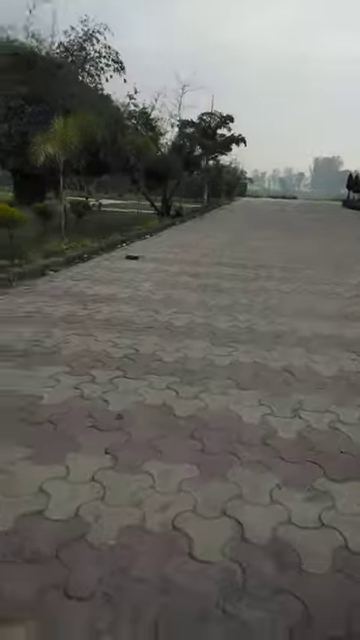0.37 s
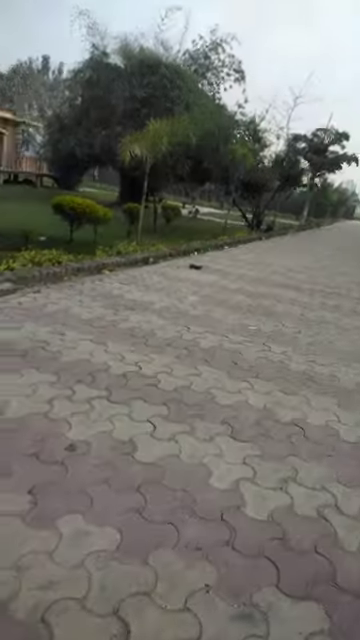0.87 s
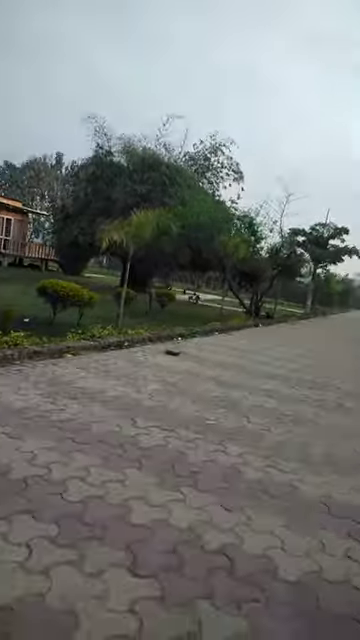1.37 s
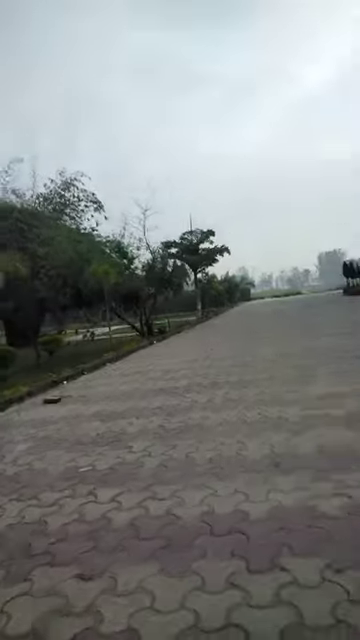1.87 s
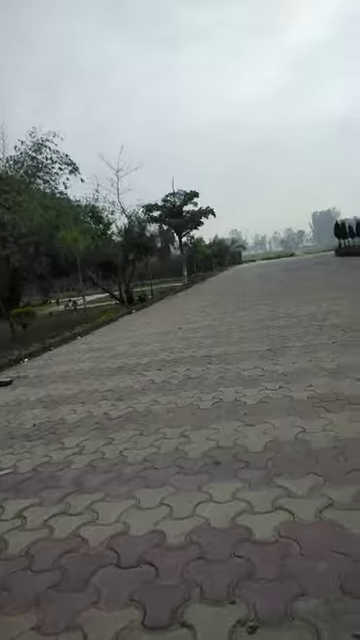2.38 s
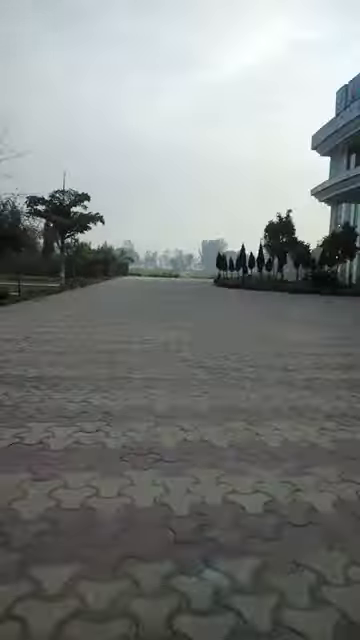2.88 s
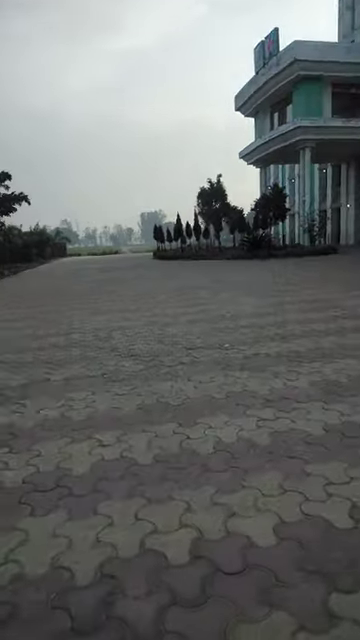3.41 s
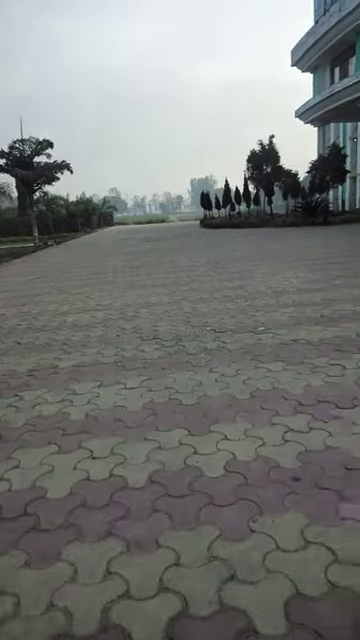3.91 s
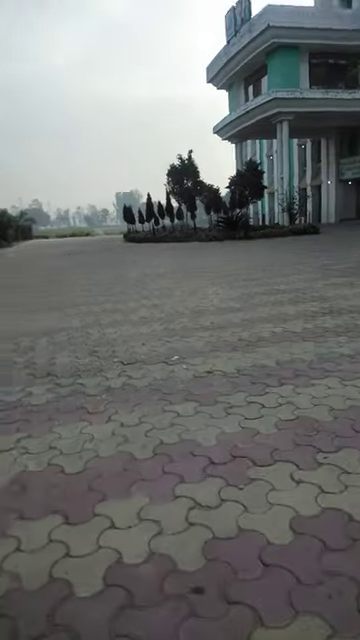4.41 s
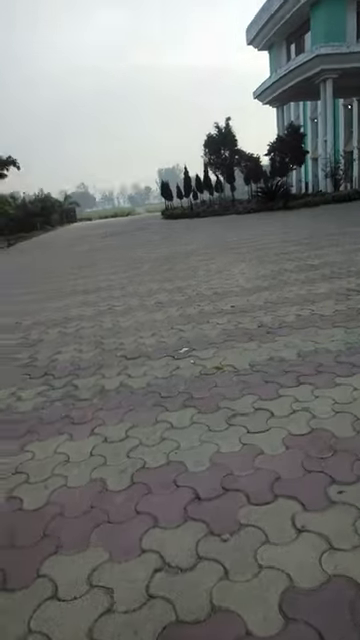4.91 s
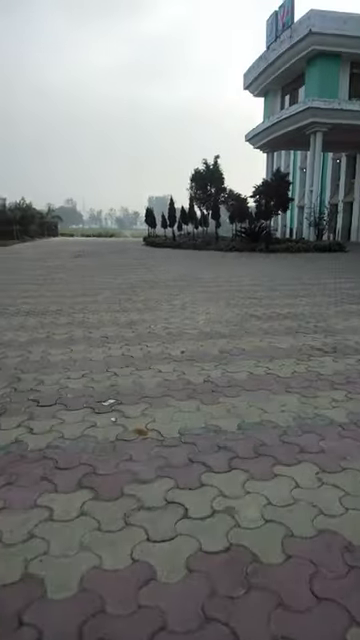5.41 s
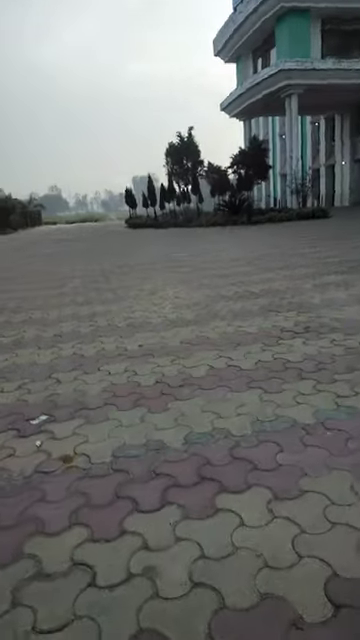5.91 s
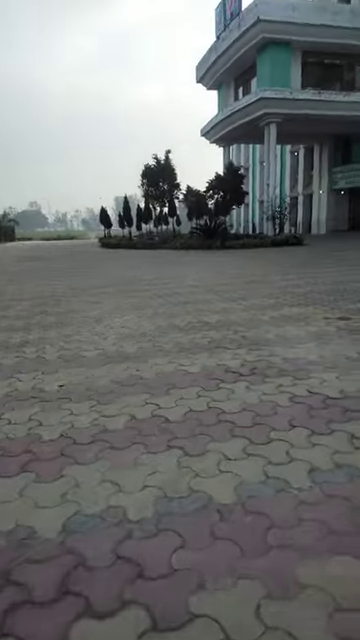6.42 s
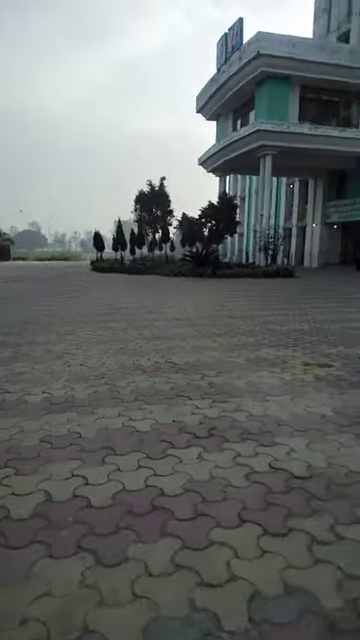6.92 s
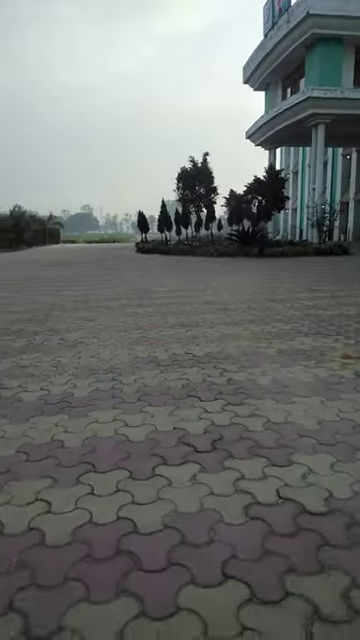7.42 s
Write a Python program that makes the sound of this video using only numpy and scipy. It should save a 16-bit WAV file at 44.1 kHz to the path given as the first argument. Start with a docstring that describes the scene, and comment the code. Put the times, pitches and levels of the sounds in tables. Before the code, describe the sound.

Close, dry handling noise: irregular muffled knocks, gritty skin scuffs and low jolting rumble on a handheld device in a quiet open yard.

```python
"""A phone is carried at a walk over paving in a quiet open yard. From the start a hand rubs its case as
band-shaped grit and jolts it into low rumble, over faint air and hiss made of shaped noise.
Knocks, as damped swings with no ring, follow throughout; near 1 s a fingertip creaks by stick and slip.
At 2.6 s the background drops away while the hand shifts, then creeps back. From 3.9 s thin far tones
glide by, as narrow noise, and from 6.2 s a blurred far hum, as wider noise, grows."""
import sys
import numpy as np
from scipy import signal
from scipy.fft import rfft, irfft
from scipy.io import wavfile
from scipy.ndimage import uniform_filter1d

SR = 44100
rng = np.random.default_rng(int(sys.argv[2]) if len(sys.argv) > 2 else 0)


def convert_level_to_amplitude(level_db):
    """Map a level in decibels to its linear amplitude factor."""
    exponent = np.asarray(level_db, float) / 20
    return 10 ** exponent


def put_to_file(sound):
    """Save the sound as 16-bit audio at rate SR, in the file named by the first command-line argument."""
    columns = np.atleast_2d(sound).T  # one column per channel
    safe = np.clip(columns, -1, 1)
    whole_steps = np.round(safe * 32767)
    wavfile.write(sys.argv[1], SR, whole_steps.astype(np.int16))


N = 332770


def evened(x):
    """Normalization: a signal is scaled to unit rms."""
    return x / np.sqrt(np.mean(x ** 2) + 1e-20)


def curve(rows, column):
    """Linear interpolation: one column of a time table, at every sample."""
    rows = np.asarray(rows, float)
    return np.interp(np.arange(N) / SR, rows[:, 0], rows[:, column])


def coloured(x, points):
    """Spectral shaping: each frequency is weighted in dB, then the whole is scaled to unit rms."""
    f, db = np.transpose(points)
    hz = np.fft.rfftfreq(len(x), 1 / SR)
    gain = convert_level_to_amplitude(np.interp(np.log(hz + 1), np.log(f + 1), db))
    return evened(irfft(rfft(x) * gain, len(x)))


def add(mix, s, sound):
    """Superposition: a sound is summed into the mix from time s."""
    part = mix[max(round(s * SR), 0):][:len(sound)]
    part += sound[:len(part)]


def swell(mix, middle, length, db):
    """Superposition of a smooth rise and fall around a moment."""
    shape = convert_level_to_amplitude(db) * np.hanning(round(length * SR))
    position = np.arange(len(shape)) + (middle - length / 2) * SR
    return mix + np.interp(np.arange(N), position, shape, 0, 0)


def grit(per_s, spread_db):
    """Impulsive friction: tiny catches of skin on plastic, a few much larger than the rest."""
    size = convert_level_to_amplitude(spread_db * np.minimum(rng.exponential(1, N), 4))
    return size * rng.standard_normal(N) * (rng.random(N) < per_s / SR)


def push(hz, t60, rise, size=1500):
    """Heavy damping: a swing with a soft start dies away exponentially; its peak is 1."""
    t = np.arange(size) / SR
    swing = (1 - np.exp(-(t / rise) ** 2)) * convert_level_to_amplitude(-60 * t / t60) * np.sin(2 * np.pi * hz * t)
    return swing / abs(swing).max()


def fuzzy(hz, width_hz):
    """Modulation: slow complex noise, carried on the pitch curve hz, becomes a narrow moving band."""
    wander = signal.lfilter([1], [1, -np.exp(-np.pi * width_hz / SR)], rng.standard_normal((2, N)))
    carrier = np.exp(2j * np.pi * np.cumsum(hz) / SR)
    return evened(((wander[0] + 1j * wander[1]) * carrier).real)


# The restless hand between events. Each row: time in seconds, rub level in dB,
# brightness in dB relative to the rub, sway rumble in dB.
HAND_MOTION = [(0, -58, -2, -54), (0.3, -69.5, 6.5, -54.5), (0.56, -78.5, 12, -59), (0.75, -66, 12, -53.5),
               (0.96, -66.5, 3, -54), (1.3, -67, -4, -57), (1.7, -68.5, -2.5, -49.5),
               (2.5, -63.5, -1.5, -48.5), (2.6, -80.5, -1, -58.5), (3.0, -76, -5, -53.5),
               (3.33, -79.5, -5.5, -48), (3.5, -70, 0, -57.5), (4.0, -73.5, -0.5, -54.5),
               (4.8, -78, -4.5, -53.5), (5.5, -73, -14, -48.5), (5.8, -75, -6, -50.5),
               (6.6, -67.5, -9.5, -51), (7.55, -81, 1, -52.5)]
# Slow rubs that swell and fade. Each row: middle in seconds, length in seconds, rub level in dB,
# brightness in dB relative to the rub.
SLOW_RUBS = [(0.097, 0.25, -57.5, 3.5), (0.421, 0.098, -57.5, 0), (1.053, 0.18, -48, 11),
             (1.131, 0.063, -45.5, -6.5), (1.19, 0.15, -52.5, -8.5), (1.415, 0.29, -55.5, -10.5),
             (1.784, 0.11, -85, -22), (2.024, 0.15, -44.5, -9.5), (2.141, 0.18, -40.5, -4.5),
             (3.423, 0.14, -64, -5.5), (3.547, 0.092, -65, -16), (3.898, 0.047, -62.5, -10.5),
             (4.15, .2, -62, -10), (4.916, .2, -68, -7), (5.11, 0.12, -69, -8.5), (5.46, .2, -66.5, -12),
             (5.993, 0.18, -56.5, -13), (6.702, 0.18, -66, -23), (6.857, .12, -72, -5),
             (7.137, 0.17, -66, -9), (7.266, 0.053, -69, -7)]
# Jolts of the walk through the arm. Each row: middle in seconds, rumble level in dB.
WALK_JOLTS = [(0.24, -54), (0.88, -51), (1.0, -41.5), (1.2, -48), (1.38, -45), (1.76, -58), (2.0, -52),
              (2.07, -48), (2.13, -53), (2.32, -54), (2.48, -51.5), (2.88, -45), (3.04, -43), (3.28, -37.5),
              (3.38, -55), (3.598, -45.5), (3.8, -56), (4.161, -50.5), (4.421, -45), (4.88, -45.5),
              (5.04, -46), (5.44, -40.5), (5.6, -35.5), (5.68, -40), (6.0, -32), (6.08, -34.5), (6.24, -64),
              (6.54, -55), (6.72, -37.5), (6.8, -44), (7.28, -59), (7.44, -53)]
# Short drags of skin with clear ends. Each row: start in seconds, length in seconds, rub level in dB,
# brightness in dB relative to the rub, shake level in dB.
SKIN_SCUFFS = [(0.08, 0.11, -59, 9.5, -43), (0.227, 0.059, -55, 0, -62), (0.79, 0.092, -62, 15.5, -48),
               (0.825, 0.021, -46, 15.5, -36), (0.839, 0.032, -43, 4.5, -43), (1.42, 0.01, -43, -9, -26),
               (1.437, 0.011, -55, 2, -27), (1.45, 0.01, -37, -10, -41), (1.461, 0.011, -39, -9, -44),
               (1.478, 0.0057, -34.5, -5.5, -24), (1.489, 0.011, -25.5, -12.5, -24),
               (1.5, 0.015, -29, -11, -38), (1.514, 0.013, -47, 10.5, -24.5), (1.548, 0.0083, -29, -4, -24),
               (1.955, 0.013, -31.5, -4.5, -31), (2.188, 0.17, -58, 1, -55), (2.568, 0.017, -68, -20, -56),
               (2.676, 0.025, -59, -12, -47), (2.698, 0.018, -61.5, 5, -49), (2.722, 0.017, -55, 0, -39),
               (2.756, 0.012, -41.5, 7, -48), (2.777, 0.012, -48, 6, -53), (2.79, 0.018, -44.5, 2.5, -32),
               (2.806, 0.086, -39.5, -0.5, -34), (2.979, 0.0063, -43, 4.5, -24),
               (3.027, 0.023, -45, -8, -26.5), (3.096, 0.047, -60, -20, -57),
               (3.162, 0.027, -44.5, -7.5, -38.5), (3.307, 0.028, -50.5, -8, -42.5),
               (3.658, 0.082, -69, 11, -65), (4.316, 0.058, -51, -8.5, -48), (4.502, 0.031, -55.5, -4, -51),
               (5.088, 0.038, -60, -12, -32), (5.685, 0.027, -38.5, -17, -34.5),
               (6.013, 0.089, -36, -11, -52), (6.04, 0.042, -31.5, -6, -25), (6.078, 0.026, -45, -7, -38.5),
               (6.702, 0.011, -28, -4, -41), (6.756, 0.031, -54, -6.5, -52)]
# Spectrum of skin on the case. Each row: frequency in Hz, relative density in dB per Hz.
RUB_SPECTRUM = [(60, -24), (150, 1), (400, -5.5), (1000, -8.5), (2300, -15), (3500, -21.5), (5000, -31.5),
                (7000, -39.5), (8800, -36.5), (11000, -47), (16000, -75)]
# Spectrum of the shaken port. Each row: frequency in Hz, relative density in dB per Hz.
RUMBLE_SPECTRUM = [(10, -23), (25, 5), (70, -4), (150, -8.5), (300, -24), (700, -18), (2000, -88.5)]
# Spectrum of the carrying arm. Each row: frequency in Hz, relative density in dB per Hz.
SWAY_SPECTRUM = [(5, 3), (15, 4.5), (40, -5), (90, -10), (160, -21), (300, -33.5), (2000, -100)]
JOLT_S = 0.14
RESTLESS_DB, RESTLESS_S = 5, 0.08  # rms wander of the rub level, and its smoothing time


def strokes():
    """Friction noise: dense grit under the moving skin; the same motion shakes the port into rumble."""
    size = round(RESTLESS_S * SR)
    restless = evened(uniform_filter1d(uniform_filter1d(rng.standard_normal(N), size), size))
    rub_gain = convert_level_to_amplitude(curve(HAND_MOTION, 1) + RESTLESS_DB * restless)
    bright_gain = rub_gain * convert_level_to_amplitude(curve(HAND_MOTION, 2))
    sway_gain = convert_level_to_amplitude(curve(HAND_MOTION, 3))
    shake_gain = np.zeros(N)
    for s, length, db, bright_db in SLOW_RUBS:
        rub_gain = swell(rub_gain, s, length, db)
        bright_gain = swell(bright_gain, s, length, db + bright_db)
    for s, db in WALK_JOLTS:
        sway_gain = swell(sway_gain, s, JOLT_S, db)
    for s, length, db, bright_db, shake_db in SKIN_SCUFFS:
        taper = np.clip(0.015 / length, 0.4, 1)
        contact = signal.windows.tukey(round(length * SR) + 90, taper)
        add(rub_gain, s - 0.001, convert_level_to_amplitude(db) * contact)
        add(bright_gain, s - 0.001, convert_level_to_amplitude(db + bright_db) * contact)
        add(shake_gain, s - 0.001, convert_level_to_amplitude(shake_db) * contact)
    rub = coloured(grit(7000, 1.0), RUB_SPECTRUM)
    dull = signal.lfilter(*signal.butter(2, 1600, fs=SR), rub)
    bright = rub - dull
    uneven = convert_level_to_amplitude(0.7 * evened(uniform_filter1d(rng.standard_normal(N), 350)))
    shake = shake_gain * coloured(grit(1500, 3.4), RUMBLE_SPECTRUM)
    shake = shake + sway_gain * coloured(grit(250, 1.52), SWAY_SPECTRUM)
    # the hand passes only slow motion
    shake = signal.sosfilt(signal.butter(4, 350, fs=SR, output="sos"), shake)
    return uneven * (rub_gain * dull + bright_gain * bright) + shake


# Spectrum of the air and hiss. Each row: frequency in Hz, relative density in dB per Hz.
AIR_SPECTRUM = [(60, -24.5), (120, -7.5), (200, 1), (260, -12.5), (500, -9.5), (850, -21.5), (1300, -19),
                (2000, -25), (3000, -32), (6000, -33), (16000, -32.5)]
# The background drops away while the hand shifts, then creeps back.
# Each row: time in seconds, change of the air level in dB.
AIR_CHANGE = [(0, 0), (1, -1.5), (2.5, -2), (2.575, 1), (2.6, -24), (3.33, -19), (3.4, -13), (4, -8),
              (5, -5.5), (6, -5), (7, -4), (7.55, -3)]
# Thin far tones that glide, swell and fade. Each row: start in seconds, length in seconds,
# first frequency in Hz, last frequency in Hz, level at the height of the swell in dB.
FAR_TONES = [(3.926, .3, 386, 436, -75), (5.1, 0.37, 379, 389, -71), (6.142, .42, 385, 508, -70.5),
             (6.338, 0.276, 864, 940, -73), (6.772, .25, 843, 808, -68.5), (6.749, 0.924, 784, 759, -71.5),
             (6.797, 0.96, 940, 900, -81.5), (6.898, 1, 1740, 1760, -84), (7.307, 0.424, 401.5, 491, -68)]
# A blurred far hum that grows late. The row: start in seconds, rise in seconds, centre in Hz,
# width in Hz, full level in dB.
FAR_HUM = (6.2, 2, 898, 300, -74)
AIR_DB = -62.5  # rms before the changes
TONE_WIDTH_HZ = 17


def yard():
    """Band-limited noise: broad for distant air and hiss, narrow for gliding tones and a far hum."""
    t = np.arange(N) / SR
    air_gain = convert_level_to_amplitude(AIR_DB + curve(AIR_CHANGE, 1))
    background = air_gain * coloured(rng.standard_normal(N), AIR_SPECTRUM)
    for start, length, first_hz, last_hz, db in FAR_TONES:
        glide_hz = np.interp(t, [start, start + length], [first_hz, last_hz])
        tone_gain = np.sqrt(swell(0, start + length / 2, length, 2 * db))  # the swell is in power
        background = background + tone_gain * fuzzy(glide_hz, TONE_WIDTH_HZ)
    start, rise, hz, width_hz, db = FAR_HUM
    band = signal.butter(2, [hz - width_hz / 2, hz + width_hz / 2], "band", fs=SR, output="sos")
    hum = evened(signal.sosfilt(band, rng.standard_normal(N)))
    return background + convert_level_to_amplitude(db) * np.clip((t - start) / rise, 0, 1) * hum


TICKS_PER_S, TICK_DB, TICK_SPREAD_DB = 1.8, -56, 3  # the level varies evenly by +/- the spread
TICK_HZ, TICK_EDGE_DB = 520, -20.5  # the pitch varies by +/- half an octave; edge relative to the blow


def ticks():
    """Poisson process: faint knocks of the grip come by chance, as rows like those of the knocks."""
    when, size, pitch = rng.random((40, 3)).T
    at = np.cumsum(-np.log(1 - when) / TICKS_PER_S)
    rows = []
    for s, a, b in zip(at, size, pitch):
        if s < N / SR:
            db = TICK_DB + TICK_SPREAD_DB * (2 * a - 1)
            rows.append((s, db, TICK_HZ * 2 ** (b - 0.5), 0, TICK_EDGE_DB))
    return rows


# Knocks of the grip. Each row: time in seconds, peak of the blow in dB, pitch of the blow in Hz,
# thump in dB relative to the blow, edge in dB relative to the blow.
GRIP_KNOCKS = [(0.037, -43, 910, -5, 4), (0.078, -35, 577, -7, -7), (0.232, -39, 684, 6, -6.5),
               (0.237, -27, 575, -11, -11), (0.401, -46.5, 463, 2.5, -9), (0.588, -42, 1330, -15, -11),
               (0.645, -32.5, 584, -23, -12.5), (0.714, -50.5, 1070, 0, 10), (0.754, -36.5, 620, -14, -6),
               (0.77, -45, 800, -6, -6), (1.214, -11.5, 471, -12.5, -43), (1.307, -54.5, 345, 15, -23),
               (1.367, -38, 900, 1, -7), (1.386, -21, 327, -2.5, -8.5), (1.416, -25, 395, -4.5, -46),
               (1.543, -31.5, 330, -5, -40), (1.55, -14, 613, -23, -24), (1.552, -20, 714, -7, -33),
               (1.788, -33.5, 580, -31, -27), (1.899, -27.5, 704, -25, -30.5),
               (1.956, -16.5, 750, -13, -12), (1.959, -27, 520, -31, -15), (1.964, -22.5, 490, -35, -28),
               (1.985, -19.5, 730, -13, -18), (2.329, -48.5, 550, 1.5, -7), (2.358, -37, 507, -20, -37),
               (2.469, -29.5, 875, -31, -53.5), (2.501, -32, 462, -6.5, -26), (2.562, -8.5, 560, -33, -7),
               (2.679, -47, 430, -1, -17), (2.699, -38.5, 550, -7, -33), (2.728, -30.5, 564, -20, -6),
               (2.732, -41, 560, -24, -5), (2.759, -10.5, 690, -9.5, -13), (2.777, -27, 710, 0, -11.5),
               (2.946, -53, 596, -4, -20), (2.978, -17.5, 607, -1, -4.5), (3.027, -20.5, 623, 3.5, -13.5),
               (3.012, -47, 330, 14, -33), (3.073, -45, 320, 1, -40), (3.106, -25, 610, 1.5, -16),
               (3.158, -20.5, 1080, 5, -22), (3.161, -25, 520, -8, -20.5), (3.246, -44, 477, 0, -16),
               (3.305, -9, 514, -28, -9), (3.455, -45, 493, -7, -6.5), (3.636, -40.5, 900, -5.5, -19),
               (3.69, -45, 1055, -13, 6), (4.12, -41, 543, -11, -32), (4.226, -40, 430, 2.5, -17),
               (4.238, -39.5, 654, -8, -24), (4.313, -19.5, 516, -7, -9.5), (4.371, -45.5, 420, 0, -23),
               (4.501, -16.5, 900, -22.5, -9), (4.504, -20.5, 673, -2.5, -11),
               (4.585, -41.5, 360, 2.5, -44), (4.599, -47, 340, 5.5, -34), (4.686, -41, 370, 0, -42.5),
               (4.699, -45, 348, -1, -47), (4.72, -38, 490, -13, -53), (4.759, -37.5, 386, 3, -51),
               (4.772, -44.5, 344, 2, -38), (4.83, -38, 615, -14, -18), (4.934, -49.5, 335, 9, -32),
               (4.997, -44, 370, -9, -31), (5.021, -32, 388, -8, -48), (5.105, -28.5, 530, -2, -33),
               (5.109, -29, 515, -8, -35), (5.295, -41.5, 497, -10, -29), (5.411, -34, 404, -0.5, -30),
               (5.417, -42.5, 394, -16, -23), (5.477, -58, 393, 14, -18), (5.603, -42.5, 317, -3, -26),
               (5.696, -18, 550, -8.5, -18), (5.7, -23, 500, -34, -43), (5.708, -33, 477, -6, -30),
               (5.875, -46, 540, -2, -24), (5.926, -33, 400, -1.5, -31), (5.967, -18.5, 343, 3, -38),
               (5.992, -33.5, 950, -27, -35), (6.127, -30, 344, -3, -54), (6.166, -27, 416, -9, -53),
               (6.473, -33.5, 560, -26, -41), (6.595, -41.5, 720, -14, -32), (6.7, -31, 704, -7, -17),
               (6.703, -12.5, 310, -34, -19), (6.7066, -15.5, 756, -22, -13), (6.766, -38, 396, 8, -24),
               (7.097, -43, 516, -6.5, -31), (7.129, -33.5, 422, -10, -58), (7.196, -41.5, 800, -29, -33),
               (7.423, -36.5, 366, -3.5, -51)]
# Pitch of the thump, lower while the hand shifts. Each row: time in seconds, frequency in Hz.
THUMP_GLIDE = [(0, 121), (2.3, 125), (2.7, 72), (2.9, 70), (2.98, 125), (3.03, 75.4), (3.2, 84), (3.4, 125),
               (4.5, 139), (5.4, 131), (5.6, 101), (5.95, 120), (7.55, 139)]
THUMP_T60, EDGE_T60, SCRAPE_T60 = 0.014, 0.005, 0.014  # s
BLOW_T60 = 0.0057  # s at 500 Hz, shorter in proportion as the pitch rises


def knocks():
    """Damped impact: a blow flexes the case and thumps the port's air; hard contact adds a gritty edge."""
    out, edge, drag = np.zeros((3, N))
    t = np.arange(2000) / SR
    for s, db, hz, thump_db, edge_db in GRIP_KNOCKS + ticks():
        thump_hz = np.interp(s, *np.transpose(THUMP_GLIDE))
        # a soft contact lasts longer and is duller
        flesh = np.hanning(2.5 + round(max(-edge_db, 0) * 0.0073 / hz * SR))
        blow = np.convolve(push(hz, BLOW_T60 * 500 / hz, 0.14 / hz), flesh)
        add(out, s - len(flesh) / SR / 2, -convert_level_to_amplitude(db) * blow / abs(blow).max())
        add(out, s - 0.002, -convert_level_to_amplitude(db + thump_db) * push(thump_hz, THUMP_T60, 0.0061, size=4000))
        # the port's pressure evens out slowly
        add(out, s, convert_level_to_amplitude(db + thump_db - 17.5) * push(16.9, 0.22, 0.0048, size=12000))
        onset = 1 - np.exp(-t / 0.00045)
        add(edge, s + 0.00043, convert_level_to_amplitude(db + edge_db - 60 * t / EDGE_T60) * onset)
        add(drag, s + 0.0016, convert_level_to_amplitude(db + 0.5 * edge_db - 19.0 - 60 * t / SCRAPE_T60))
    sharp = coloured(grit(20000, 0.86), [(1000, -20.0), (2300, 10), (3500, -1), (5000, -15.5),
                                         (8500, -14), (12000, -34.5), (16000, -56)])
    return out + edge * sharp + drag * coloured(grit(10000, 5.1), RUB_SPECTRUM)


# A fingertip sticks and slips. Each row: time in seconds, slips per second, peak level in dB.
FINGER_CREAK = [(.9888, 172, -33.5), (1.0, 174, -20), (1.03, 189, -13), (1.036, 250, -30.5),
                (1.043, 127, -24), (1.057, 103, -10), (1.073, 150, -13.5), (1.088, 105, -17),
                (1.104, 106, -17.5)]
# How the case swings after a slip. Each row: frequency in Hz, relative share, t60 in seconds,
# rise in seconds, spread of pitch as a natural logarithm.
CASE_SWINGS = [(185, 0.43, 0.023, 0.0019, 0.15), (354, 1.33, 0.0071, 0.001, 0.19),
               (900, 1.38, 0.0042, 0.0004, 0.37)]
SLIP_GRIT_DB = -25  # relative to the slip


def creak():
    """Stick-slip: each slip lets the case jump inward and swing back, varied, with a puff of grit."""
    t = np.arange(N) / SR
    live = (t > FINGER_CREAK[0][0]) & (t < FINGER_CREAK[-1][0])
    wobble = 1 + 0.015 * evened(uniform_filter1d(rng.standard_normal(N), 250))
    phase = np.cumsum(live * curve(FINGER_CREAK, 1) * wobble) / SR
    slips = np.flatnonzero(np.diff(np.floor(phase)))  # one slip per whole cycle
    out, puff = np.zeros((2, N))
    level_db = curve(FINGER_CREAK, 2)
    for at, (size, *bends) in zip(slips, rng.uniform(-1, 1, (40, 4))):
        jump = 0
        for (hz, share, t60, rise, spread), bend in zip(CASE_SWINGS, bends):
            jump = jump + share * push(hz * np.exp(spread * bend), t60, rise)
        add(out, at / SR, -convert_level_to_amplitude(level_db[at] + 1.2 * size) * jump / abs(jump).max())
        add(puff, at / SR, convert_level_to_amplitude(level_db[at] - 60 * np.arange(1000) / SR / 0.014))
    return out + convert_level_to_amplitude(SLIP_GRIT_DB) * puff * coloured(grit(9000, 1.6), RUB_SPECTRUM)


def scene():
    """Superposition: all sources sum in one channel."""
    return (strokes() + yard() + knocks() + creak())[None]


def roll_off(x):
    """The treble ends steeply here."""
    return signal.sosfilt(signal.butter(12, 15810, fs=SR, output="sos"), x)


def record(dry):
    """High-pass response: the microphone drops the lowest bass, below 9 Hz."""
    heard = signal.lfilter(*signal.butter(1, 9, "high", fs=SR), dry)
    return roll_off(heard)


dry = scene()
out = record(dry)
put_to_file(out)
```